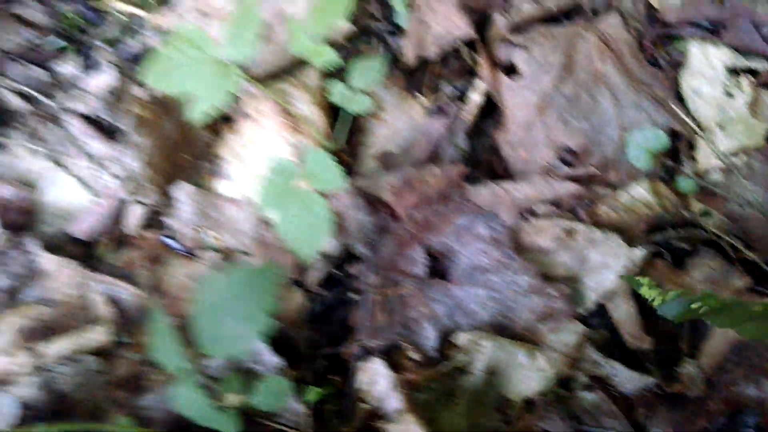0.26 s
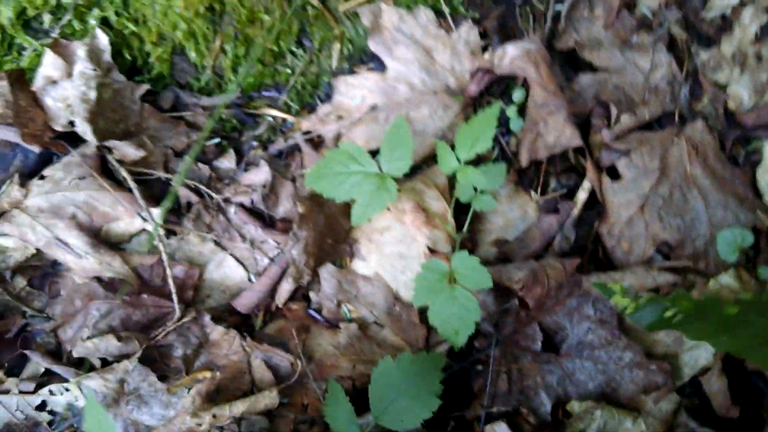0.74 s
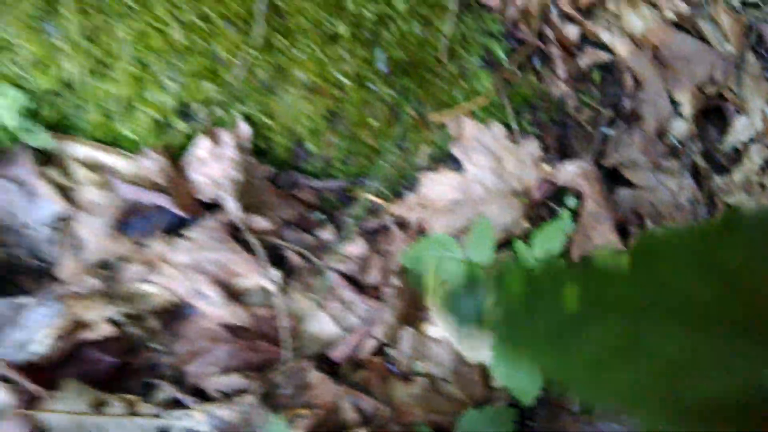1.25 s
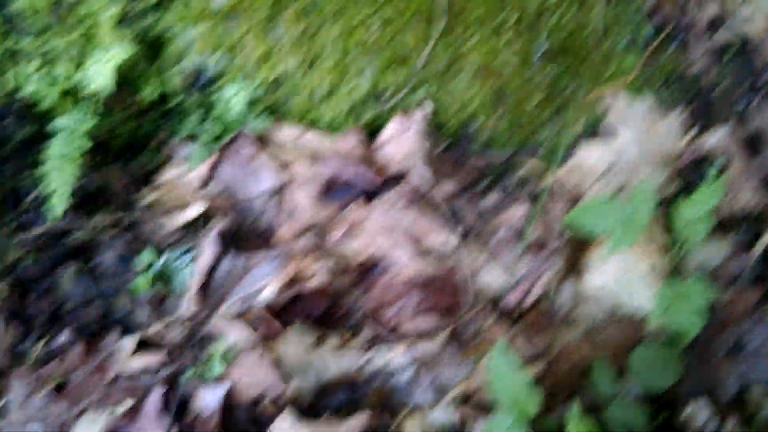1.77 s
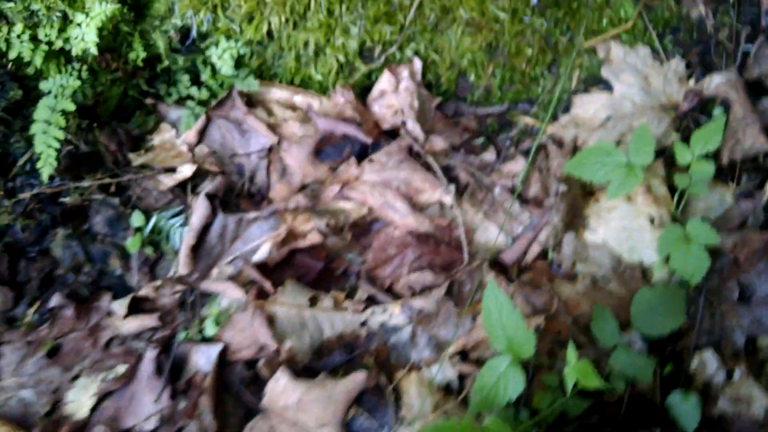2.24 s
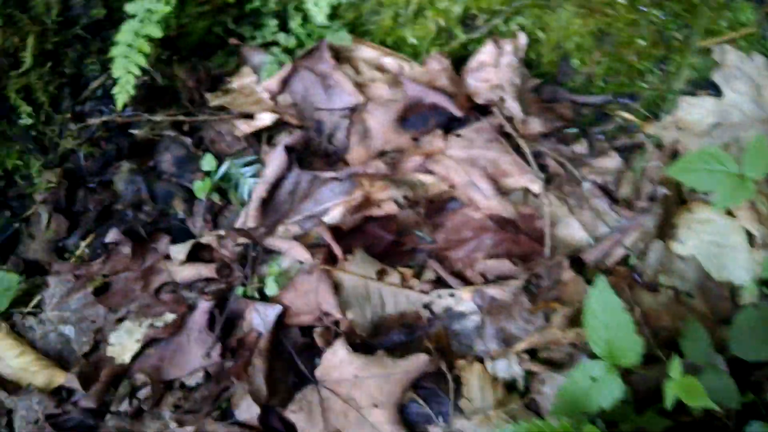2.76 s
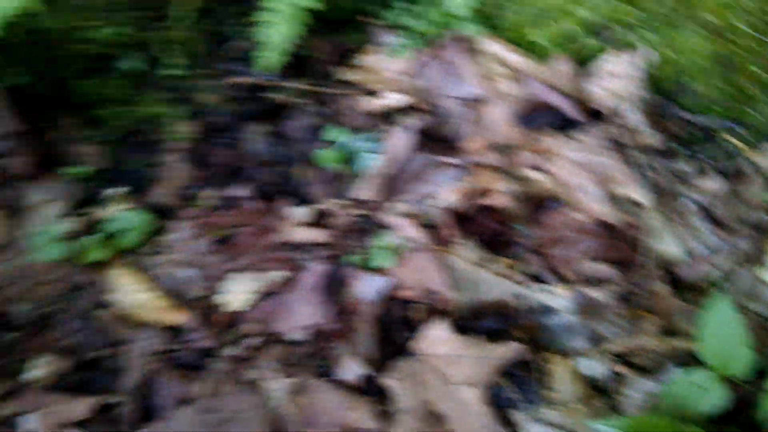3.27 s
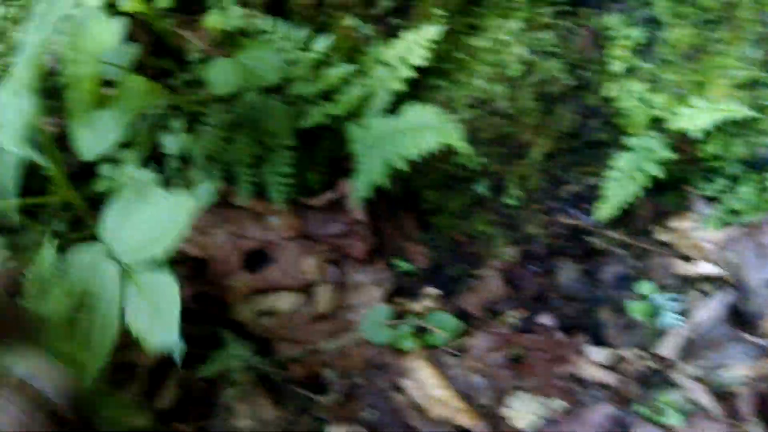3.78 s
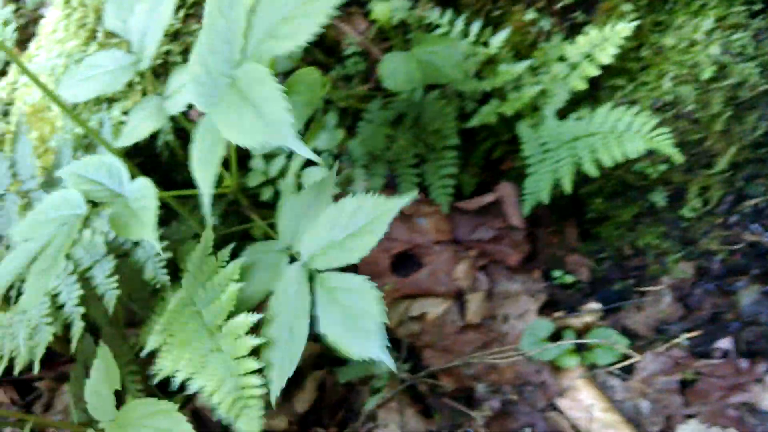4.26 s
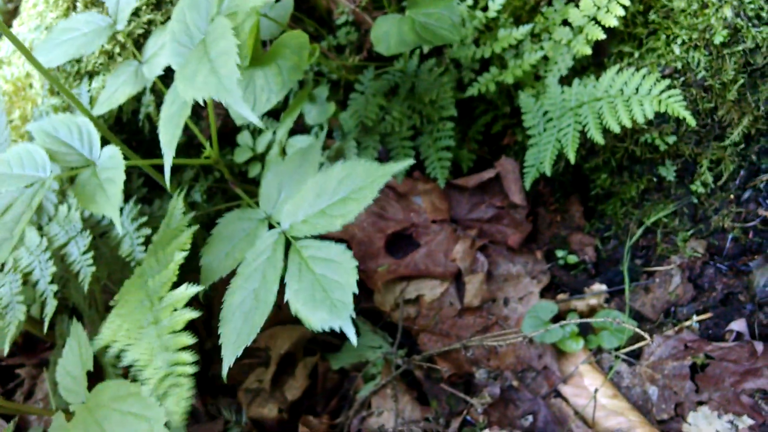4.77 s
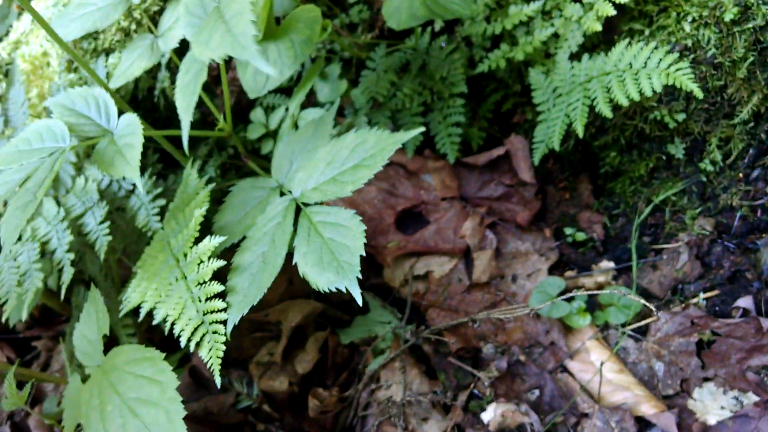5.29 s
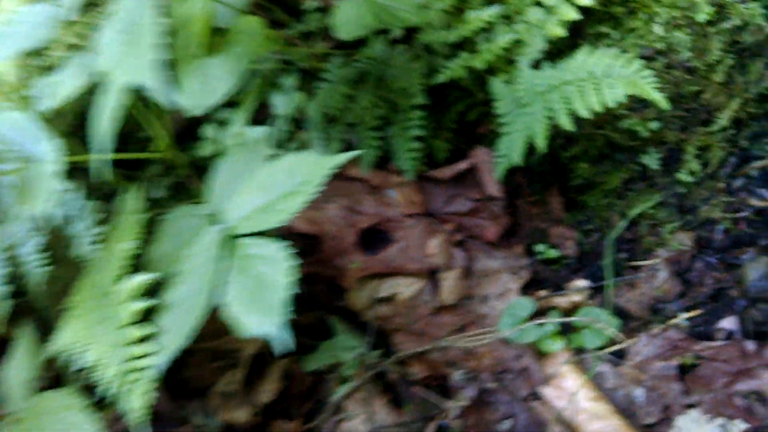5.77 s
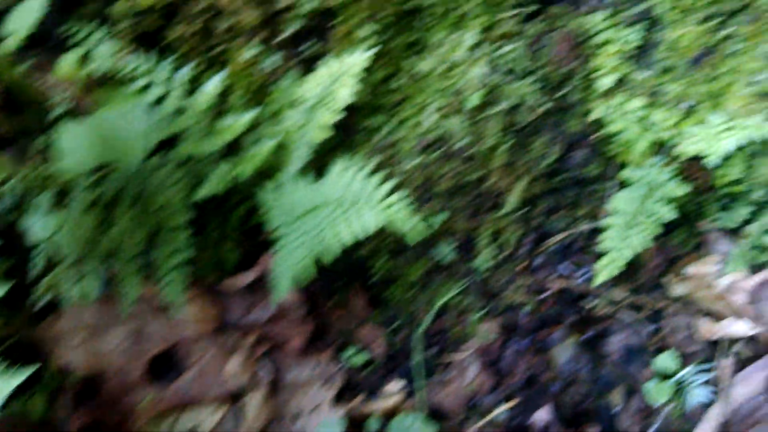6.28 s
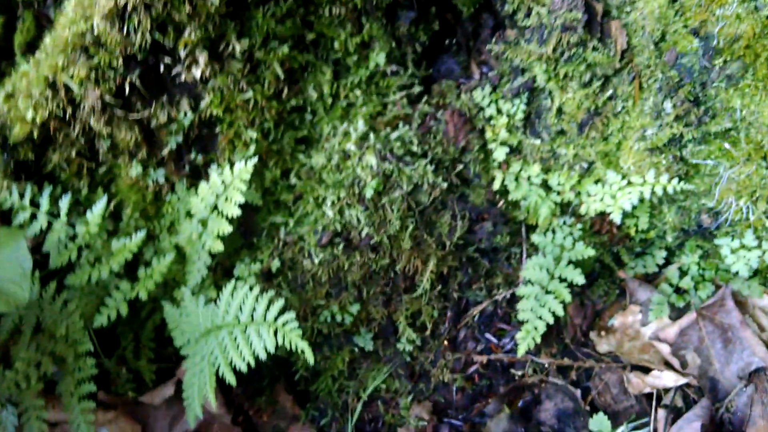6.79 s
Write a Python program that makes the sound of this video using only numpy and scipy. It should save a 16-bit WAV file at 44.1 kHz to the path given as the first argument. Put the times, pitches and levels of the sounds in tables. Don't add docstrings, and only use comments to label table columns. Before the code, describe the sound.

Busy, close rustling of dry leaves opens the scene, crisp and scratchy, mixed with sharp twig snaps and low handling thumps, heavier on the right. The movement weakens after two seconds and is mostly over by about three and a half. What remains is quiet outdoor air, sparse tiny clicks, a low steady engine hum from far off, light fabric brushes and faint high bird notes becoming more frequent near the end.

```python
import sys
import numpy as np
from scipy import signal
from scipy.fft import rfft, irfft, next_fast_len
from scipy.io import wavfile
from scipy.ndimage import uniform_filter1d

SR = 44100
rng = np.random.default_rng(int(sys.argv[2]) if len(sys.argv) > 2 else 0)


def pcm_store(signal):
    levels = np.round(np.clip(np.atleast_2d(signal), -1, 1) * 32767)
    wavfile.write(sys.argv[1], SR, levels.astype(np.int16).T)


def field_ratio(decibels):
    return 10 ** (np.asarray(decibels, dtype=float) / 20)


N = 310023


def rms_one(x):
    return x / np.sqrt(np.mean(x ** 2) + 1e-20)


def in_time(rows):
    s, *columns = np.transpose(rows)
    return [np.interp(np.arange(N) / SR, s, column) for column in columns]


def at_hz(points, hz):
    point_hz, value = np.transpose(points)
    return np.interp(np.log(hz), np.log(point_hz), value)


def drift(rate_hz):
    r = np.exp(-16 * 2 * np.pi * rate_hz / SR)
    noise = rng.standard_normal(N // 16 + 5002)
    slow = signal.lfilter([1], [1, -2 * r, r * r], noise)[5000:]
    return np.interp(np.arange(N) / 16, np.arange(len(slow)), rms_one(slow))


def resonate(x, hz, width_hz):
    r = np.exp(-np.pi * width_hz / SR)
    gain = (1 - r * r) / 2
    return signal.lfilter([gain, 0, -gain], [1, -2 * r * np.cos(2 * np.pi * hz / SR), r * r], x)


def delayed(x, lag_s, share=0.98):
    size = next_fast_len(N + 256)
    hz = np.maximum(np.arange(size // 2 + 1) * SR / size, 1)
    gain = share if np.isscalar(share) else at_hz(share, hz)
    return irfft(rfft(x, size) * gain * np.exp(-2j * np.pi * hz * lag_s), size)[..., :N]


def hump(start_s, end_s):
    a, b = round(start_s * SR), round(end_s * SR)
    swell = np.sin(np.linspace(0, np.pi, b - a)) ** 0.045
    b = min(b, N)
    return slice(a, b), swell[:b - a]


def coloured(source, low_hz, high_hz, spectrum, patchy_db, alike=None, leak=None):
    out = 0
    edges_hz = np.geomspace(low_hz, high_hz, int(2.2 * np.log2(high_hz / low_hz)) + 2)
    for k, (low, high) in enumerate(zip(edges_hz, edges_hz[1:])):
        sos = signal.butter(2, [low, high], "band", fs=SR, output="sos")
        band = signal.sosfilt(sos, source[k % 2])
        hz = np.sqrt(low * high)
        if alike:
            c = np.clip(at_hz(alike, hz), 0, 1)
            band = np.sqrt(1 + c) * band[0] + np.sqrt(1 - c) * band[1] * [[1], [-1]]
        if leak:
            c = np.clip(at_hz(leak, hz), 0, 1)
            band[0] = c * band[1] + np.sqrt(1 - c * c) * band[0]
        out = out + field_ratio(at_hz(spectrum, hz) + patchy_db * drift(21.6)) * band
    return rms_one(out)


# (frequency [Hz], density [dB per Hz])
WOOD_SPECTRUM = [(30, 1), (60, 10.5), (120, 5.5), (250, -4.5), (450, -12.5), (800, -18.5), (1500, -29),
                 (2600, -25.5), (4500, -38.5), (6200, -34.5), (8500, -49), (11000, -43.5), (15000, -33)]
# (frequency [Hz], likeness [0-1])
WOOD_ALIKE = [(25, 0.76), (70, 1), (400, 1), (1200, 0), (3000, 0.37), (8000, .0)]


def wood_air():
    noise = rng.standard_normal((2, 2, N))
    return field_ratio(-37) * coloured(noise, 15.15, 19400, WOOD_SPECTRUM, patchy_db=1.5, alike=WOOD_ALIKE)


# (frequency [Hz], width [Hz], level [dB])
DRONE_PARTIALS = [(28, 5, -78), (59.2, 2.8, -50), (115.3, 26, -44.5), (148, 9.1, -49.5), (185, 2.3, -58.5),
                  (209, 5.5, -59.5), (232, 11, -62), (263.7, 2.8, -57.5), (308.7, 2.1, -54),
                  (353.7, 10, -57.5), (409, 16, -61), (508.6, 23, -62.5), (603, 7, -69), (707, 18, -80)]
# (time [s], level under 130 Hz [dB], level above [dB])
DRONE_SWELL = [(0, -14, -4.5), (2, -4.5, -3.5), (3.2, -0.5, -1), (4.5, 0, -1), (5.7, 3.5, 1.5),
               (7.03, 2.5, 1.5)]


def drone(level_db=6, steady=3.2, port_lag_s=0.00033):
    low_db, upper_db = in_time(DRONE_SWELL)
    out, noise, t = np.zeros(N), rng.standard_normal(N + SR), np.arange(N) / SR
    for hz, width_hz, partial_db in DRONE_PARTIALS:
        narrow = rms_one(resonate(resonate(noise, hz, width_hz), hz, width_hz)[SR:])
        tone = np.sin(2 * np.pi * hz * t + 1.2 * drift(1.27))
        swell_db = low_db if hz < 130 else upper_db
        out += field_ratio(partial_db + level_db + swell_db) * rms_one(narrow + steady * tone)
    return np.array([out, delayed(out, port_lag_s)])


# (start [s], end [s], start pitch [Hz], end pitch [Hz], level [dB])
WHISTLES = [(4.2, 4.31, 3480, 3480, -61), (4.36, 4.64, 3620, 3540, -61), (4.67, 4.8, 5000, 4980, -65),
            (4.885, 4.95, 9200, 10250, -57), (4.96, 5.01, 9500, 10200, -62),
            (4.96, 5.02, 13800, 15400, -56), (5.08, 5.12, 15400, 14600, -58),
            (5.11, 5.145, 10800, 11000, -59), (5.145, 5.18, 10900, 10500, -60),
            (5.46, 5.59, 5600, 4600, -61), (6.16, 6.21, 4500, 4490, -62), (6.225, 6.28, 4490, 4490, -58),
            (6.29, 6.36, 4490, 4480, -60), (6.44, 6.52, 4500, 4480, -59), (6.525, 6.56, 4470, 4470, -58),
            (6.57, 6.61, 4480, 4470, -57), (6.62, 6.68, 4470, 4460, -56), (6.69, 6.74, 4460, 4460, -61),
            (6.735, 6.83, 3780, 3980, -58), (6.83, 6.91, 3980, 4080, -61), (6.89, 7.03, 2250, 2400, -58),
            (6.87, 6.99, 2720, 2600, -59), (6.94, 7.03, 5400, 5500, -57), (6.93, 7.03, 4930, 5000, -61),
            (6.95, 7.03, 4720, 4780, -63)]


def birds():
    out = np.zeros(N)
    flutter, waver_rad = field_ratio(2.0 * drift(30)), 0.4 * drift(60)
    for start_s, end_s, from_hz, to_hz, level_db in WHISTLES:
        span, swell = hump(start_s, end_s)
        phase = 2 * np.pi * np.cumsum(np.linspace(from_hz, to_hz, len(swell))) / SR
        out[span] += field_ratio(level_db) * swell * np.sin(phase + waver_rad[span]) * flutter[span]
    return np.array([out, 0.13 * delayed(out, 0.0001)])


# (start [s], end [s], centre [Hz], width [Hz], level [dB])
SWISHES = [
    (4.282, 4.366, 9700, 1500, -60),
    (5.454, 5.53, 9500, 1500, -61),
    (5.78, 6.106, 11100, 704, -63),
    (5.913, 5.99, 9700, 1800, -60),
    (6.183, 6.56, 10500, 600, -61),
    (6.302, 6.485, 11600, 700, -60.5),
    (6.677, 6.768, 9500, 1600, -59),
]


def swishes():
    out, noise = np.zeros((2, N)), rng.standard_normal((2, N))
    for start_s, end_s, hz, width_hz, level_db in SWISHES:
        span, swell = hump(start_s, end_s)
        hiss = resonate(resonate(noise[:, span], hz, width_hz), hz, width_hz)
        out[:, span] += field_ratio(level_db + 4.5) * swell ** 5 * rms_one(hiss)
    return out * field_ratio(np.array([[-4], [0]]))


# (time [s], peak [dB], ring [Hz], left against right [dB])
KNOCKS = [(0.082, -23.5, 336, 0), (0.988, -15, 277, -18), (1.018, -9, 248, -19), (1.192, -13, 115, -22),
          (1.2, -18, 316, -8), (1.033, -17, 300, -10), (1.552, -16, 224, -8), (1.47, -25, 114, -8),
          (1.598, -12, 110, -21), (1.974, -18.5, 900, -16), (3.019, -23, 148, -8), (3.447, -32, 1490, -20),
          (3.715, -18.5, 142, 0), (3.722, -21.5, 360, 0.5), (4.169, -39, 724, -2), (4.187, -30, 590, -1),
          (4.215, -47, 600, -12), (4.25, -34.5, 736, -1), (4.327, -34.5, 2320, 6.5), (5.25, -33, 955, -9),
          (5.624, -36, 675, -19)]
# (time [s], tick peak [dB], tick centre [Hz], stem ring [dB])
TICKS = [(2.117, -12, 12100, -64), (2.7, -14, 9400, -60), (3.25, -18, 8510, -60), (3.283, -16, 11550, -60),
         (3.3258, -16, 11270, -63), (3.735, -17, 9000, -54), (3.92, -30, 9700, -36),
         (4.374, -24, 14300, -46), (4.7428, -27, 9400, -60), (4.8472, -27, 3110, -37),
         (5.0253, -28, 6000, -37), (5.1814, -30.5, 3350, -44), (5.249, -23, 9400, -33.5),
         (5.736, -36, 9000, -58), (5.691, -29, 11400, -55), (5.825, -27, 9500, -41),
         (5.917, -24, 9000, -52), (6.067, -30.5, 6450, -43), (6.154, -25, 9100, -43),
         (3.3613, -37, 11600, -60), (4.51, -33, 8800, -60), (4.622, -40, 9300, -60), (4.66, -35, 6000, -53),
         (4.70, -32, 8500, -60), (4.947, -36, 6000, -55), (6.125, -36, 3000, -50), (6.325, -40, 9300, -60)]
# (frequency [Hz], level [dB], left against right [dB])
STEM_MODES = [(3000, 2, 7), (4600, 0, 3), (6100, -21, 7)]


def knocks(cycles=7.5, level_db=3):
    out, t = np.zeros((2, N + 2000)), np.arange(2000) / SR
    stems = []
    for s, _, _, ring_db in TICKS:
        stems += [(s, ring_db + mode_db, hz, left_db) for hz, mode_db, left_db in STEM_MODES]
    for s, peak_db, hz, left_db in KNOCKS + stems:
        at = round(s * SR)
        ring = field_ratio(peak_db + level_db - 60 * t * hz / cycles) * np.sin(2 * np.pi * hz * t)
        ports_db = np.array([[min(left_db, 0)], [min(-left_db, 0)]])
        out[:, at:at + 2000] += ring * field_ratio(ports_db)
    return out[:, :N]


# (time [s], peak [dB], centre [Hz], left against right [dB])
SNAPS = [(0.0877, -5, 8000, -16), (0.115, -6, 10500, -5), (0.1665, -12, 7350, 2), (0.2134, -13, 11300, 4),
         (0.2364, -14.5, 6770, -5), (0.2892, -13, 11300, -6), (0.628, -8, 13700, 1),
         (0.6873, -8.5, 8680, -16.5), (0.7932, -14.5, 4040, 5), (0.816, -9, 11700, -2),
         (0.981, -8, 14400, -11), (1.0306, -14, 13600, -12), (1.1288, -6.5, 11000, -8),
         (1.1779, -1, 8050, -6), (1.2116, -5, 9970, -5), (1.354, -7, 3970, -7), (1.3808, -7.5, 9100, -5),
         (1.505, -1, 11500, -25), (1.7394, -6.5, 13700, -13), (1.7913, -5, 11700, -5),
         (1.904, -11.5, 11800, -3), (1.9857, -12.5, 11400, 0), (2.0074, -11, 9170, -5),
         (2.4785, -17, 9100, -12), (2.551, -22, 14600, 14), (2.6405, -14.5, 9150, 6),
         (2.8498, -8, 11700, -13), (2.93, -7, 3460, -24), (3.022, -8.5, 3440, -6), (3.0862, -16, 11900, -5),
         (0.4005, -25, 8530, -10), (0.6065, -32, 7000, -15), (0.705, -10, 11500, -5),
         (0.9602, -18, 11600, -5), (1.145, -5, 9000, -5), (1.4157, -12, 13900, -1), (1.5175, -11, 9000, -3),
         (1.5963, -11, 11500, -3), (1.7659, -8, 11560, -1), (1.785, -4, 13500, -4), (2.038, -15, 4340, -5),
         (2.0906, -19, 14200, -3), (2.139, -21, 8200, 3), (2.4633, -19, 9090, -5), (2.4997, -17, 13800, -1),
         (2.654, -11, 8950, 0), (2.8564, -19.5, 3210, 8), (3.1572, -12, 11900, -2), (3.19, -20, 8500, -5),
         (3.2251, -34, 11400, -8)]


def snaps(wide_db=-6, level_db=-2, decay_s=0.00125, attack_s=0.0003, tick_left_db=-6):
    rows = SNAPS + [(s, peak_db, hz, tick_left_db) for s, peak_db, hz, _ in TICKS]
    out, t = np.zeros((2, N + 800)), np.arange(800) / SR
    thin = signal.butter(2, 2200, "high", fs=SR, output="sos")
    for s, peak_db, hz, left_db in rows:
        burst = rng.standard_normal((2, 800)) * np.exp(-t / decay_s) * np.minimum(t / attack_s, 1)
        burst = resonate(burst, hz, 0.35 * hz) + field_ratio(wide_db) * signal.sosfilt(thin, burst)
        at = round(s * SR)
        ports_db = np.array([[left_db], [0]])
        out[:, at:at + 800] += field_ratio(peak_db + level_db + ports_db) * burst / np.abs(burst).max()
    return out[:, :N]


def strokes(rows):
    t, power = np.arange(0, N + 32, 32) / SR, 0
    for s, level_db, rise_s, fall_s, second_db in rows:
        away = np.where(t < s, (s - t) / max(rise_s, 0.004), (t - s) / max(fall_s, 0.004))
        power = power + field_ratio(2 * (level_db - 10 * away + np.array([[0], [second_db]])))
    return [np.interp(np.arange(N) / SR, t, row) for row in power]


# (time [s], effort [dB], left against right [dB])
EFFORT = [(0, -28, -9), (.04, -45.5, 1), (.62, -23, -5), (.76, -45, -1), (1.5, -43, -2), (1.9, -33, -1),
          (2.2, -44.5, 3.5), (3.3, -54, 1), (3.7, -43, -5.5), (3.8, -42.5, 3), (4.0, -48, 2.5),
          (4.5, -53, -3), (4.56, -54.5, -1.5), (5.8, -56.5, 1.5), (5.83, -54, 1), (6.38, -54.5, 1),
          (6.68, -65, 3), (7.03, -53, 0)]
# (peak time [s], rumble [dB], rise per 10 dB [s], fall per 10 dB [s],
# leaf body against rumble [dB])
PRESSES = [(0.0, -34, .01, 0.026, -34), (.10, -31, 0.02, 0.33, -3), (.25, -34.5, 0.013, 0.099, 3.5),
           (.41, -27, 0.011, 0.052, 1), (.68, -31.5, 0.4, 0.059, -0.5), (.70, -31.5, 0.0096, 0.029, 6),
           (.80, -27, 0.023, 0.19, -1.5), (.92, -31.5, 0.12, 0.52, 4.5), (1.035, -21.5, 0.42, 0.063, -12.5),
           (1.21, -17.5, 0.081, 0.044, -6), (1.35, -20, 0.055, 0.044, -7), (1.41, -31, 0.061, 0.18, 6),
           (1.50, -17.5, 0.1, 0.022, -5.5), (1.55, -14.5, 0.017, 0.07, -13), (1.61, -27.5, 0.031, 0.093, 3),
           (1.80, -28, 0.14, 0.082, 0.5), (1.98, -27, 0.033, 0.015, -14), (2.0, -39, 0.085, 0.16, 5),
           (2.54, -36.5, 0.3, 0.98, 0.5), (2.94, -40, 0.27, 0.034, 8.5), (3.03, -36, 0.018, 0.01, 10),
           (3.10, -42.5, 0.012, 0.048, 12.5), (3.73, -38.5, 0.045, 0.15, 3.5),
           (4.21, -38.5, 0.052, 0.056, -2)]
# (peak time [s], fizz [dB], rise per 10 dB [s], fall per 10 dB [s],
# rustle against fizz [dB])
SWEEPS = [(.115, -35.5, 0.054, 0.36, -2), (.238, -36, 0.0042, 0.05, -6), (.265, -30, 0.018, .08, -3.5),
          (.41, -29.5, 0.024, 0.037, -2), (.689, -28.5, 0.0069, 0.032, -0.5),
          (.794, -27.5, 0.01, 0.13, -0.5), (.88, -22.5, 0.035, 0.02, -8.5),
          (1.03, -32.5, 0.33, 0.089, -2.5), (1.21, -27, 0.075, 0.067, 0.5), (1.35, -36.5, .04, 0.3, 3.5),
          (1.48, -33, 0.47, 0.038, -7), (1.51, -21, 0.012, 0.012, -15), (1.61, -27.5, 0.028, 0.089, -6),
          (1.83, -25.5, 0.19, 0.032, -8), (2.0, -34.5, 0.16, 0.16, -6), (2.36, -37, 0.2, 0.034, -5.5),
          (2.552, -32, 0.032, 0.039, 0.5), (2.62, -35, 0.17, 0.84, -5), (2.94, -38.5, 0.25, 0.036, 0.5),
          (3.03, -34.5, 0.071, 0.037, 0.5), (3.089, -27.5, 0.0041, 0.024, -3.5),
          (3.17, -38, 0.028, 0.093, -4), (3.68, -48.5, 0.98, 0.049, 2), (3.74, -41.5, 0.011, 0.032, -2.5),
          (6.93, -54.5, 0.21, 0.033, 0.5)]
# (level at usual effort [dB], slope [dB per dB])
FOLLOW = [
    (-66, 0.059),
    (-50.5, 0.39),
    (-55, 0.87),
    (-52, 0.75),
]


def zone_levels(usual_db=-45.5, sweep_in_body_db=-22, left_db_per_db=-0.2313):
    effort_db, left_db = in_time(EFFORT)
    rumble, body = strokes(PRESSES)
    fizz, rustle = strokes(SWEEPS)
    body = body + field_ratio(2 * sweep_in_body_db) * rustle
    levels_db = []
    for power, (at_db, slope) in zip((rumble, body, rustle, fizz), FOLLOW):
        rest = field_ratio(2 * (at_db + slope * (effort_db - usual_db)))
        levels_db.append(10 * np.log10(power + rest))
    return levels_db, left_db + left_db_per_db * (levels_db[3] - effort_db)


# (low [Hz], high [Hz], level [dB], left port [dB])
ZONES = [
    (38, 447, -1, -13),
    (417, 2750, -5, -6),
    (2791.6, 7200, 0, -1),
    (7180, 21400, 3, -2.5),
]
# (frequency [Hz], density [dB per Hz])
LEAF_SPECTRUM = [(40, -32), (70, 0), (130, 0.5), (250, -3.5), (450, -8), (800, -11.5), (1500, -17.5),
                 (2600, -17), (4500, -15.5), (6200, -14.5), (8000, -22.5), (11000, -23), (15000, -25)]
# (frequency [Hz], share [0-1])
LEAF_ALIKE = [(100, 0.15), (500, 0.28), (1500, 0.067), (4000, 0.1), (12000, 0.067)]
# (time [s], roughness [ratio])
ROUGH = [(0, 1.3), (1.9, 0.65), (2.1, 1.03), (2.8, 0.26), (3.0, 1.07), (3.35, 1.3), (3.5, 0.35),
         (7.03, 0.67)]


def brushing(per_s=500, spread_db=3.5, grain_db=-3.5, clump_db=0.98, own_db=0.1):
    levels_db, left_db = zone_levels()
    rough, = in_time(ROUGH)
    stroke = field_ratio(rough * clump_db * (0.5 * drift(48) + drift(260)))
    born = rng.random((2, N)) < per_s * field_ratio(5 * drift(25)) / SR
    cracks = born * field_ratio(spread_db * np.minimum(rng.exponential(1, (2, N)), 3.6))
    burst = signal.lfilter([1], [1, -0.94], cracks)
    grain = 1 + rough * field_ratio(grain_db) * rms_one(burst)
    source = stroke * rng.standard_normal((2, 2, N)) * grain
    source /= np.sqrt(uniform_filter1d(np.mean(source ** 2, axis=(0, 1)), 6000))
    out = np.zeros((2, N))
    for (low_hz, high_hz, level_db, port_db), curve_db in zip(ZONES, levels_db):
        zone = coloured(source, low_hz, high_hz, LEAF_SPECTRUM, patchy_db=2.3, leak=LEAF_ALIKE)
        zone *= field_ratio(curve_db + level_db + rough * own_db * drift(67))
        zone[0] *= field_ratio(left_db + port_db)
        out += zone
    return out


def scene():
    background = wood_air() + drone() + birds()
    return background + swishes() + knocks() + snaps() + brushing()


def low_pass(x):
    return signal.sosfilt(signal.butter(12, 15900, fs=SR, output="sos"), x)


# (frequency [Hz], share of the other port taken away [0-1])
TAKEN_AWAY = [(100, 0.68), (1000, 0.6), (2500, 0.68), (3800, 0.6), (5000, 0.36), (7500, 0.36), (10300, 0.5),
              (13000, 0.64), (15100, 0.62), (15450, 0.4)]


def record(dry):
    wide = dry - delayed(dry[::-1], 0.0003904, TAKEN_AWAY)
    top_cut = signal.ellip(7, 0.5, 30, 15500, fs=SR, output="sos")
    mix = signal.sosfilt(top_cut, wide)
    return low_pass(mix)


dry = scene()
out = record(dry)
pcm_store(out)
```